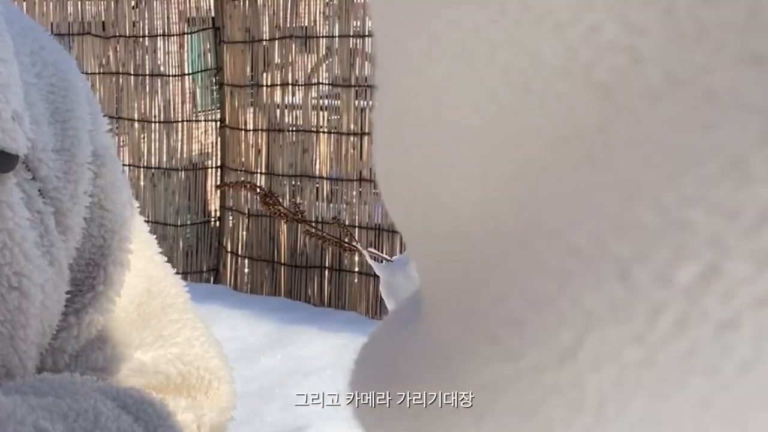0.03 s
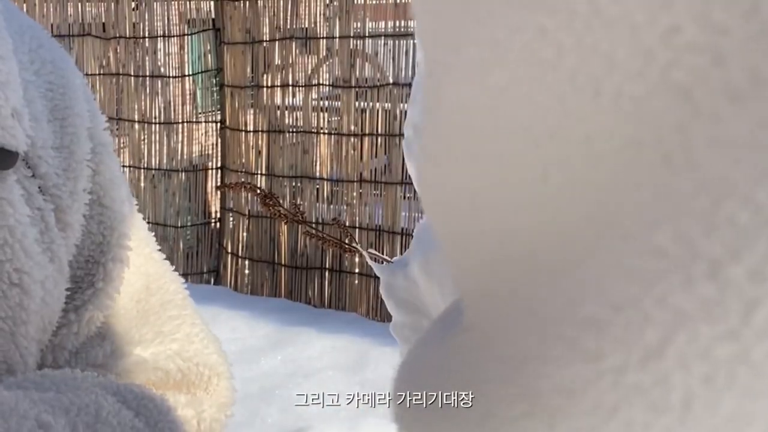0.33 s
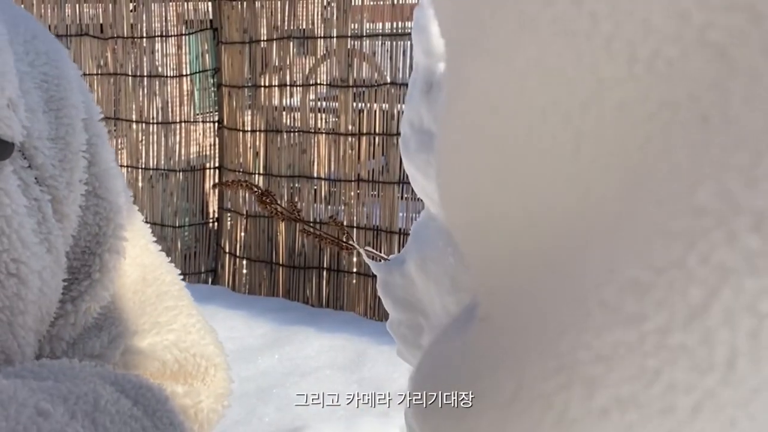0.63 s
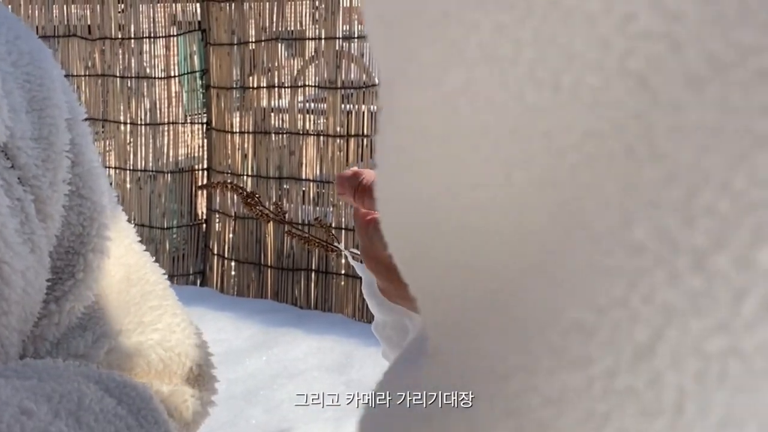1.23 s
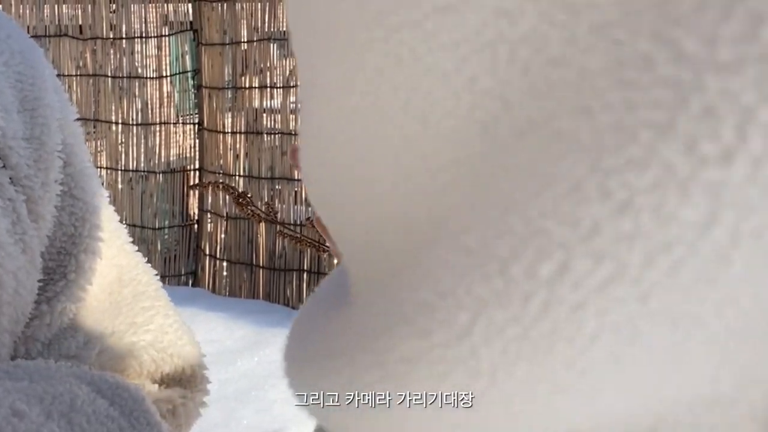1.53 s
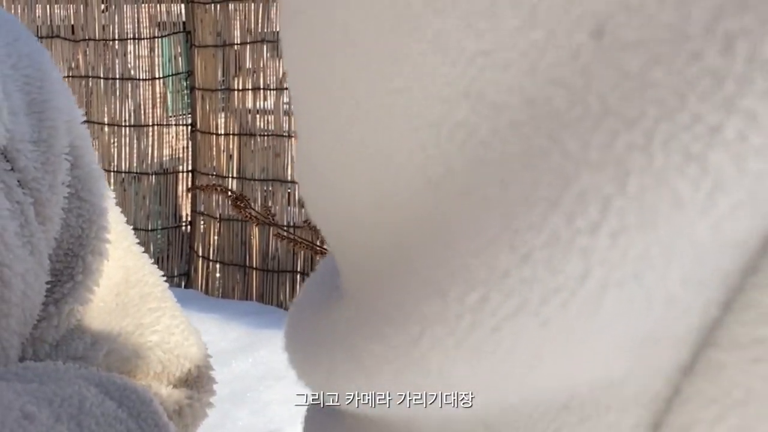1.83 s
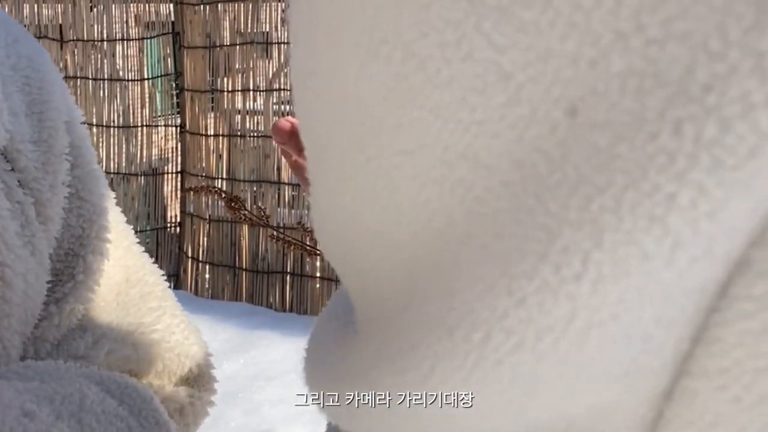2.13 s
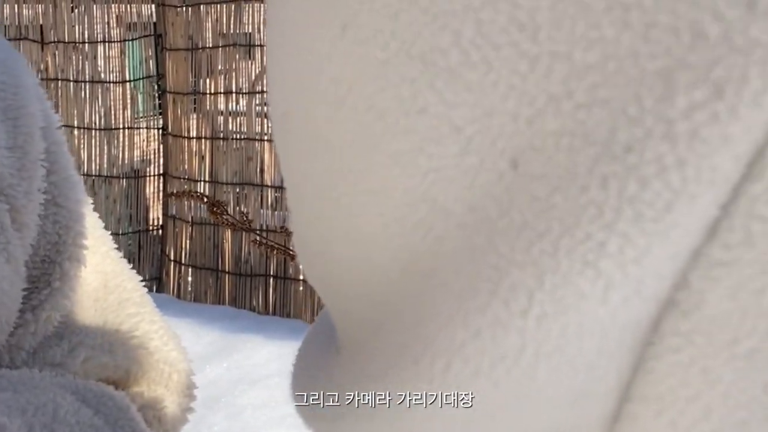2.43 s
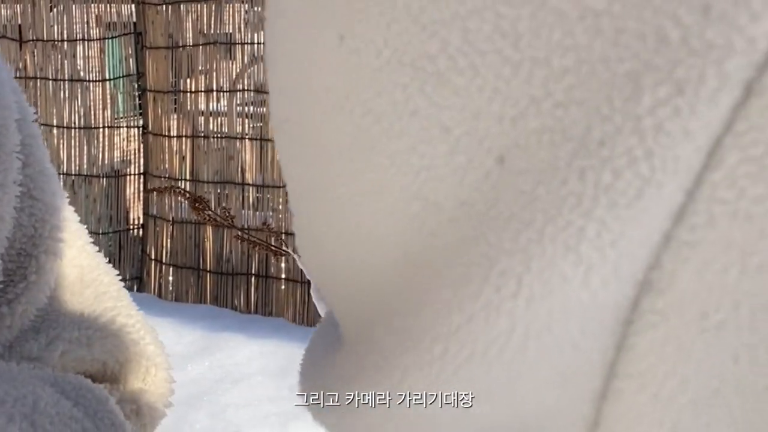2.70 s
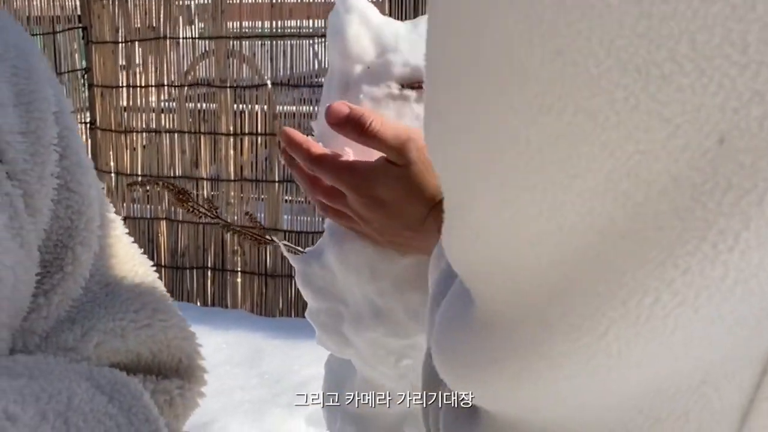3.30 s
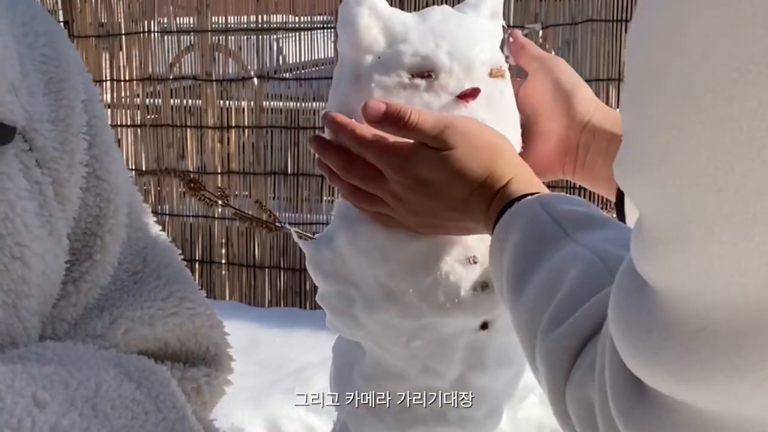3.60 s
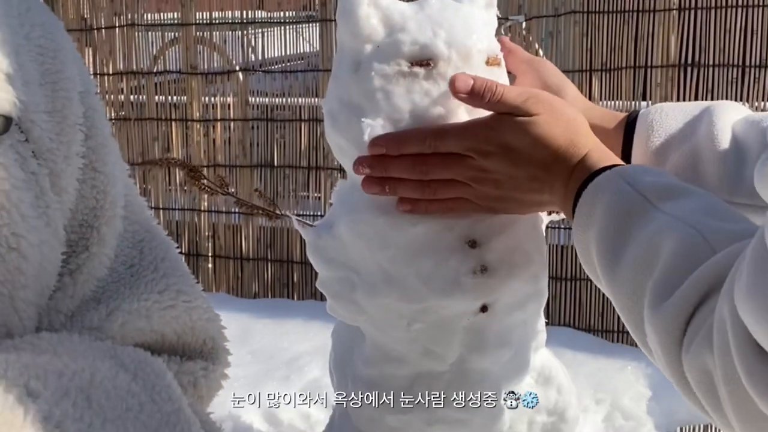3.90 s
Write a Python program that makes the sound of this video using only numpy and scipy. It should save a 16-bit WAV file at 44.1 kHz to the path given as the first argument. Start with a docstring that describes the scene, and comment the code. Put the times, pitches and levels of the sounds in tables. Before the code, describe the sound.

Dull pats of palms on a snowman, with faint snow crackles and soft wind outdoors.

```python
"""Hands pat a snowman firm in a fenced outdoor space, over a low rumble of wind.
First come two soft pats among tiny crackles of snow; nearby walls answer briefly.
At 1.6 s a firm blow excites the snowman's damped modes, a dull, hollow knock, and loose snow crumbles.
A lighter pat follows at 2.4 s, between more crackles.
Near the end the faint friction of palms and sleeves on the snow swells to a brushing rustle."""
import sys
import numpy as np
from scipy import signal
from scipy.fft import rfft, irfft, next_fast_len
from scipy.io import wavfile
from scipy.ndimage import map_coordinates

SR = 44100
rng = np.random.default_rng(int(sys.argv[2]) if len(sys.argv) > 2 else 0)


def to_wav(sig):
    """Store sig (one row per channel, or 1-D mono) as 16-bit WAV at the path in sys.argv[1].

    Samples outside -1..1 are clipped; the rate is SR.
    """
    pcm = np.clip(np.atleast_2d(sig), -1, 1) * 32767
    pcm = np.round(pcm).astype(np.int16)
    wavfile.write(sys.argv[1], SR, pcm.T)  # frames by channels


N = 174195

# spectra of the wind's rumble and rush: frequency_hz, gain_db
RUMBLE_SPECTRUM = [(20, -38.5), (32, -21), (42, -2), (52, -4), (64, 3.5), (80, -8), (100, -9), (118, -6),
                   (150, -14), (195, -16), (300, -26), (600, -69.5)]
AIR_SPECTRUM = [(120, -28), (200, 1.5), (215, -10.5), (240, -6.5), (390, -10), (624, -9), (833, -13),
                (1660, -25), (3170, -45), (5550, -49.5), (6530, -45), (7420, -51), (11200, -63),
                (15000, -66)]
# likeness of the rush in left and right: frequency_hz, correlation
AIR_CORRELATION = [(200, 0.65), (500, 0.067), (1000, 0.023), (3000, 0.045), (10000, 0.4)]
# envelopes of rumble, rush and brushing: time_s, level_db
RUMBLE_ENVELOPE = [(0, -48), (1.25, -45), (1.43, -50.5), (1.7, -46), (2.8, -47), (3.2, -48.5), (3.95, -48)]
AIR_ENVELOPE = [(0, -56.5), (1.0, -55.5), (1.5, -56), (2.1, -55), (3.0, -56), (3.95, -56.5)]
BRUSH_ENVELOPE = [(0, -84.5), (.4, -83.5), (.62, -80.5), (.85, -87), (1.35, -81), (1.9, -84), (2.9, -93.5),
                  (3.25, -79), (3.5, -81.5), (3.68, -73.5), (3.85, -76.5), (3.95, -79.5)]
# spectrum of palms and sleeves sliding on snow: frequency_hz, gain_db
BRUSH_SPECTRUM = [(800, 0.5), (2500, 7.5), (5000, -8), (6800, 1.5), (10000, -4.5), (13000, -10.5),
                  (15000, -16)]
# clumps giving way: start_s, level_db, pitch_hz, half_width_octaves, t60_s
CLUMP_CRACKLES = [(.6314, -74, 3600, .12, 0.033), (1.0142, -66.5, 5500, 0.46, .02),
                  (1.3474, -67, 3630, 0.084, .025), (1.7683, -61, 5170, 0.77, 0.051),
                  (2.0103, -58.5, 6400, 0.11, 0.012), (2.708, -72.5, 6000, .8, .025)]
# decay of the yard's echo: frequency_hz, t60_s
ECHO_DECAY = [(200, 0.13), (1000, 0.087), (4500, 0.22), (12000, 0.098)]
# spectrum of that echo: frequency_hz, gain_db
ECHO_SPECTRUM = [(200, -6.5), (800, 1.5), (1800, -6), (4000, -10), (6600, -17), (12000, -6.5)]
# light pats: start_s, level_db, pan_db, cutoff_hz
PALM_PATS = [(0.6693, -44, 4, 800), (.9530, -38.5, -6, 1100), (2.3904, -27, -5, 12000)]
# spectra of a palm's push and its scuff: frequency_hz, gain_db
PALM_SPECTRUM = [(150, -1), (480, -11), (750, 6.5), (1200, 2.5), (1900, -7.5), (3000, -15), (3800, -14.5),
                 (4600, -36), (5600, -43), (6600, -13.5), (8500, -39), (11000, -31), (15000, -61)]
SCUFF_SPECTRUM = [(500, -8), (1200, 9), (3000, -7), (4700, -12.5), (6000, -20), (12000, -28)]
# the firm blow: start_s, level_db
FIRM_KNOCKS = [(1.5888, -20.5)]
# modes of the snowman: pitch_hz, gain_db, rise_s, t60_s, pan_db
BODY_MODES = [(235, -8.3, .0069, .1, 5), (301, -11.4, .0205, .009, 4), (470, 1.6, .0039, .019, -7),
              (629, -7.7, .0075, .014, -10), (718, -22, .0165, .09, -3), (890, -9.5, .0017, .035, -7),
              (1011, -2.5, .0018, .015, -6), (1175, -10.8, .0009, .023, -2), (1736, -13.4, .0011, .022, 13),
              (2270, -8.2, .0009, .014, 12), (4284, -9.6, .0014, .012, 10), (5040, -10.3, .0022, .008, 6),
              (6185, -19, .0013, .009, 5)]
# spectra of crushed crust and loose snow: frequency_hz, gain_db
CRUST_SPECTRUM = [(300, -1), (1000, -6), (3000, -9), (4200, 1.5), (7000, -3), (10000, -16.5), (14000, -29)]
CRUMB_SPECTRUM = [(400, 6.5), (1000, 5), (1700, 0.5), (2500, 0), (3300, -7.5), (4500, 2.5), (5600, -5),
                  (7000, -10), (9000, -16), (12000, -18), (14000, -29)]
# pieces of crust breaking off: start_s, level_db
CRUST_BREAKS = [(1.6047, -45), (1.6263, -48), (1.659, -63)]

GRAINS_PER_S, GRAIN_SPREAD_DB = 5000, 2.5
SQUEEZE_DB, SQUEEZE_T60_S = -15.5, 0.064
SCUFF_DB, SCUFF_T60_S = -27, 0.19
SPREAD_HZ_PER_RAD, MAX_SPREAD_RAD = 450, 1.5
CRUSH_DB, CRUSH_RISE_S = -36, 0.0013


def amp(db):
    """Amplitude ratio for a level in decibels."""
    return 10 ** (np.asarray(db) / 20)


def unit(x):
    """Normalisation to rms 1."""
    return x / np.sqrt(np.mean(x ** 2) + 1e-20)


def along(points, hz):
    """Interpolation on a logarithmic frequency axis."""
    f, v = np.transpose(points)
    return np.interp(np.log(hz + 1), np.log(f + 1), v)


def level(points):
    """Amplitude envelope through (time_s, level_db) points."""
    return amp(np.interp(np.arange(N) / SR, *np.transpose(points)))


def since(start_s):
    """Seconds elapsed since an onset, zero before it."""
    return np.maximum(np.arange(N) / SR - start_s, 0)


def fade(t, t60_s):
    """Exponential decay by 60 dB in t60_s, silent until t is positive."""
    return (t > 0) * np.exp(-np.log(1000) * t / t60_s)


def pan(db):
    """Constant-power gains for a level difference, left over right."""
    gains = amp(np.array([[db], [-db]]) / 2)
    return gains / np.sqrt(np.mean(gains ** 2))


def sway(depth_db, knots_per_s):
    """Amplitude modulation: a gain that follows a smooth random curve."""
    curve = map_coordinates(rng.standard_normal(256), [np.arange(N) * knots_per_s / SR], mode="mirror")
    return amp(depth_db * curve)


def filtered(x, response):
    """Linear filtering: the spectrum times a frequency response."""
    size = next_fast_len(N + SR // 2)
    return irfft(rfft(x, size) * response(np.fft.rfftfreq(size, 1 / SR)), size)[..., :N]


def noise(spectrum, correlation):
    """Partly coherent stereo noise: the mid-to-side balance sets the correlation."""
    def response(hz):
        likeness = along(correlation, hz) if np.ndim(correlation) else np.full_like(hz, correlation)
        angle = np.arccos(np.clip(likeness, -1, 1)) / 2
        return amp(along(spectrum, hz)) * np.array([np.cos(angle), np.sin(angle)])
    mid, side = filtered(rng.standard_normal((2, N)), response)
    return unit(np.array([mid + side, mid - side]))


def grit(spectrum):
    """Shot noise: dense tiny snaps of uneven size, stereo, rms 1."""
    onsets = rng.random(N) < GRAINS_PER_S / SR
    sizes = amp(GRAIN_SPREAD_DB * np.clip(rng.standard_normal(N), -2, 2))
    snaps = onsets * sizes * rng.standard_normal((2, N))
    return unit(filtered(snaps, lambda hz: amp(along(spectrum, hz))))


def impulse(spectrum, size=2048):
    """Minimum-phase pulse of peak 1, made causal by folding the cepstrum."""
    cepstrum = irfft(np.log(amp(along(spectrum, np.fft.rfftfreq(size, 1 / SR)))))
    cepstrum[1:size // 2] *= 2
    cepstrum[size // 2 + 1:] = 0
    pulse = irfft(np.exp(rfft(cepstrum)))
    return pulse / abs(pulse).max()


def wind():
    """Flow noise: a low, nearly coherent rumble under a wide, soft rush of air."""
    rumble = level(RUMBLE_ENVELOPE) * sway(1, 7.3) * pan(4) * noise(RUMBLE_SPECTRUM, correlation=0.95)
    rush = level(AIR_ENVELOPE) * sway(0.5, 5.78) * noise(AIR_SPECTRUM, AIR_CORRELATION)
    return rumble + rush


def brushing():
    """Sliding friction: palms and sleeves draw an uneven, grainy rustle from the snow."""
    return level(BRUSH_ENVELOPE) * sway(depth_db=1.9, knots_per_s=20) * grit(BRUSH_SPECTRUM)


def crackles():
    """Fracture under load: small clumps are squeezed, then give way in a band of noise."""
    out = np.zeros((2, N))
    for start_s, level_db, pitch_hz, half_width_octaves, t60_s in CLUMP_CRACKLES:
        band = lambda hz: 1 / (1 + (np.log2((hz + 1) / pitch_hz) / half_width_octaves) ** 2)
        squeeze = amp(SQUEEZE_DB) * fade(start_s - np.arange(N) / SR, SQUEEZE_T60_S)  # swells to start_s
        release = fade(since(start_s), t60_s)
        out += amp(level_db) * (squeeze + release) * unit(filtered(rng.standard_normal((2, N)), band))
    return out


def yard_echo(direct):
    """Diffuse reflection: nearby walls return a short echo, dulled by the snow."""
    hz, t, bands = signal.stft(rng.standard_normal((2, SR // 2)), SR, nperseg=256)
    decay = fade(t[None], along(ECHO_DECAY, hz)[:, None])
    tail = signal.istft(bands * decay, SR, nperseg=256)[1]
    tail *= amp(-11.5) / np.linalg.norm(tail[0])
    echo = signal.fftconvolve(direct, tail, axes=1)[:, :N]
    return filtered(echo, lambda hz: amp(along(ECHO_SPECTRUM, hz)))


def pats():
    """Soft impact: a palm gives packed snow one short push, duller when gentle, and a brief scuff."""
    out, scuff = np.zeros((2, N)), grit(SCUFF_SPECTRUM)
    for start_s, level_db, pan_db, cutoff_hz in PALM_PATS:
        push = impulse([(hz, db - 10 * np.log10(1 + (hz / cutoff_hz) ** 2)) for hz, db in PALM_SPECTRUM])
        first = round(start_s * SR)
        out[:, first:first + len(push)] += amp(level_db) * pan(pan_db) * push
        out += amp(level_db + SCUFF_DB) * pan(pan_db) * fade(since(start_s), SCUFF_T60_S) * scuff
    return out


def knock():
    """Modal resonance: a blow crushes the crust and rings the body; low modes peak last, so pitch falls."""
    out = np.zeros((2, N))
    for start_s, level_db in FIRM_KNOCKS:
        t = since(start_s)
        first = int(start_s * SR)
        span = slice(first, first + SR // 4)
        ring_s = t[span]
        for pitch_hz, gain_db, rise_s, t60_s, pan_db in BODY_MODES:
            attack = np.sin(np.pi / 2 * np.minimum(ring_s / rise_s, 1)) ** 2
            decay = np.exp(-np.log(1000) * np.maximum(ring_s - rise_s, 0) / t60_s)
            stereo_phase = np.array([[-0.5], [0.5]]) * min(pitch_hz / SPREAD_HZ_PER_RAD, MAX_SPREAD_RAD)
            mode = np.sin(2 * np.pi * pitch_hz * ring_s + stereo_phase)
            out[:, span] += amp(level_db + gain_db) * pan(pan_db) * attack * decay * mode
        crush = t / CRUSH_RISE_S * np.exp(1 - t / CRUSH_RISE_S)
        out += amp(CRUSH_DB) * pan(3) * crush * noise(CRUST_SPECTRUM, correlation=0.49)
    return out


def crumbling():
    """Granular noise: loose snow sprays after the knock, and a few larger pieces break off."""
    spray = sum(amp(-47.5) * fade(since(start_s), t60_s=0.27) for start_s, _ in FIRM_KNOCKS)
    pieces = sum(amp(db) * fade(since(start_s), t60_s=0.013) for start_s, db in CRUST_BREAKS)
    return pan(6.5) * (spray + pieces) * grit(CRUMB_SPECTRUM)


def scene():
    """Superposition: wind, brushing, the work of the hands and its echo add together."""
    background = wind() + brushing()
    hands = crackles() + pats() + knock() + crumbling()
    return background + hands + yard_echo(hands)


def record(dry, cutoff_hz=13700):
    """Band limiting: a steep low-pass removes the highest treble."""
    return filtered(dry, lambda hz: 1 / np.sqrt(1 + (hz / cutoff_hz) ** 60))


dry = scene()
out = record(dry)
to_wav(out)
```